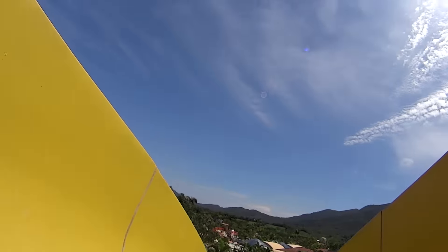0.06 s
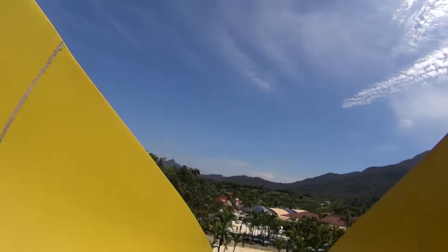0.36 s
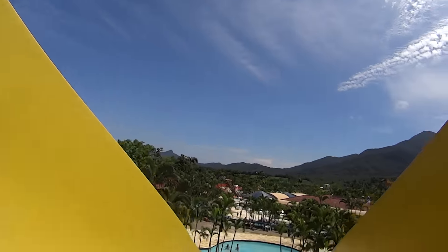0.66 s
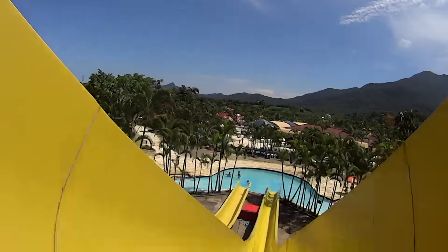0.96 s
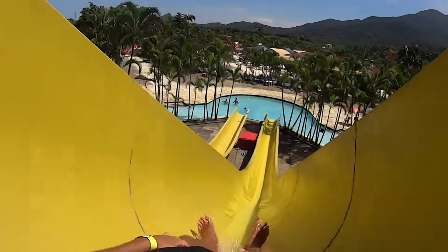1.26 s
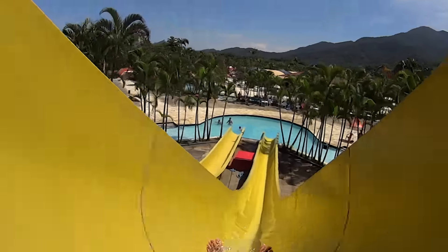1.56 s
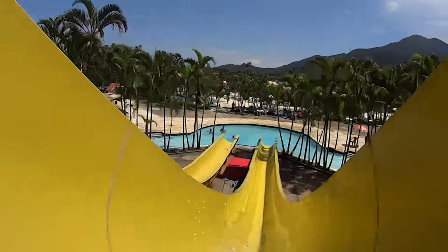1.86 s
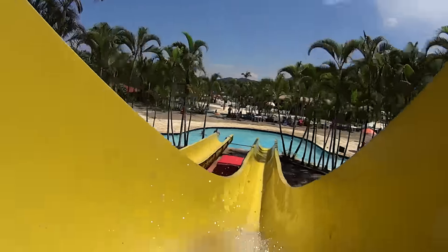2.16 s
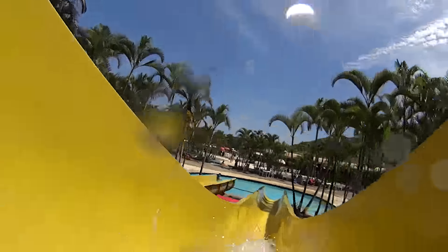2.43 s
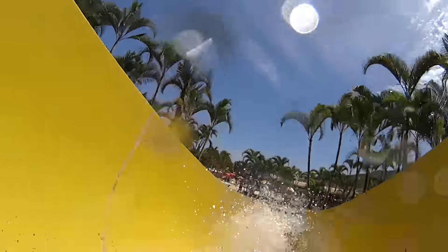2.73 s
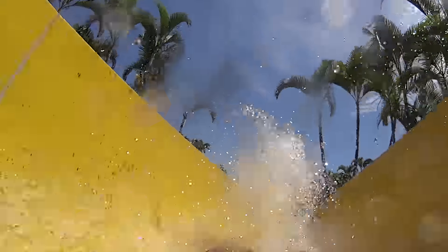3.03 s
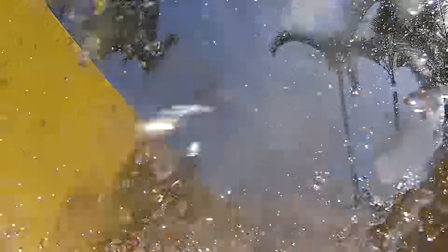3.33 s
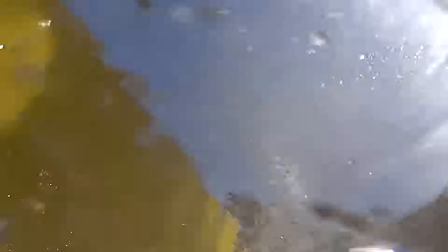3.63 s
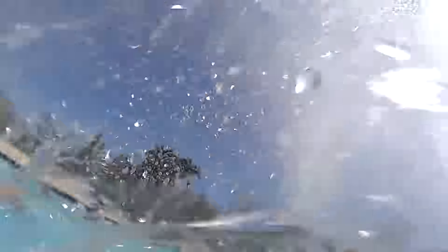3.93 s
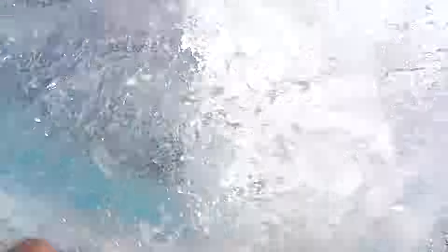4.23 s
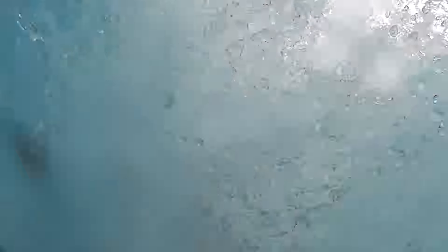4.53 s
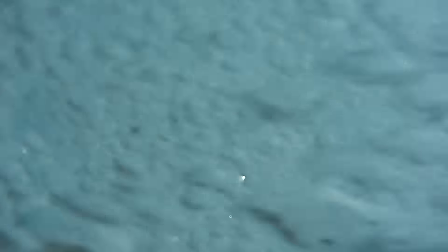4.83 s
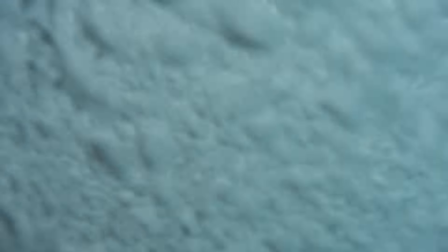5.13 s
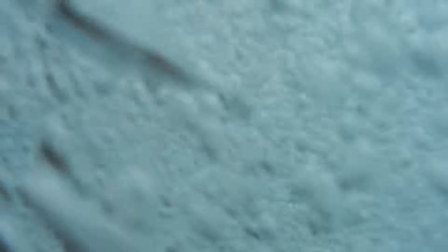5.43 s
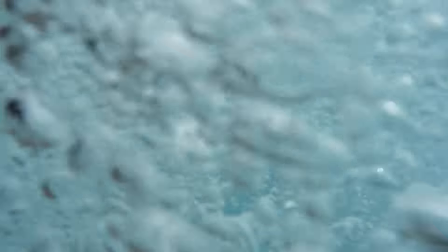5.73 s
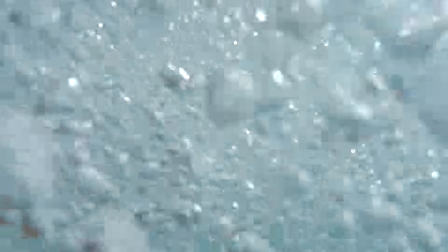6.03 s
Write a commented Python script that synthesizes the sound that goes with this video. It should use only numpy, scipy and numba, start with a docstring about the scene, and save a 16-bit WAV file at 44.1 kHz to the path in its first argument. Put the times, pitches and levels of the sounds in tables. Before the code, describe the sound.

Close, from a camera riding down an outdoor water slide: a soft watery rush with a few knocks and squirts grows louder, joined by low gusts of wind. Loud slaps and sharp drops pelt the microphone through the flat end of the slide. A foamy splash into the pool follows, then the water closes overhead, leaving a deep, muffled bubbling that fades into scattered pops and gurgles.

```python
"""On a steep open water slide, a rider with a waterproof camera shoots down and plunges into the pool.
The thin film of water hisses, then tears into spray. Wind buffets the camera's ports (its microphone
openings), and water slaps its case, most of all in the run-out, the flat end of the slide.
The splash roars and closes overhead: big bubbles rumble, small ones plink.
A fast limiter turns the sound down for a moment at each hard hit."""
import sys
import numpy as np
from scipy import signal
from scipy.fft import rfft, irfft, next_fast_len
from scipy.io import wavfile
from scipy.ndimage import uniform_filter1d, minimum_filter1d, map_coordinates
from numba import njit

SR = 44100
rng = np.random.default_rng(int(sys.argv[2]) if len(sys.argv) > 2 else 0)


def master(y):
    """Save y as 16-bit WAV."""
    cut = np.clip(np.atleast_2d(y).T, -1, 1)
    pcm = np.round(cut * 32767)  # scale
    wavfile.write(sys.argv[1], SR, pcm.astype(np.int16))


N = 277124
T = np.arange(N) / SR


# Sounds are built as (mid, side) pairs: mid is what both ports share, side is how they differ.
# A ring time, or t60, is the seconds a sound takes to fade by 60 dB.
def undb(db):
    """Turn decibels into a gain to multiply by."""
    return 10 ** (np.asarray(db) / 20)


def unit(x):
    """Scale a (mid, side) pair so that the mid has an average strength (rms) of 1."""
    return x / np.sqrt(np.mean(x[0] ** 2))


def toward(pan):
    """Mid and side weights of a sound placed from -1 (left) to 1 (right)."""
    return np.array([np.ones_like(pan), -np.clip(pan, -1, 1)])


def swell(table, fade_in_s, fade_out_s):
    """Gain that follows (time [s], level [dB]) rows and dies away outside them."""
    s, db = np.transpose(table)
    times = [s[0] - fade_in_s, *s, s[-1] + fade_out_s]
    return undb(np.interp(T, times, [db[0] - 60, *db, db[-1] - 60]))


def envelope(full_s, db, attack_s, hold_s, fall_db_per_s):
    """Gain that rises to db by the time full_s, holds, then dies away."""
    rise = np.clip(1 + (T - full_s) / attack_s, 0, 1)
    return rise * undb(db - fall_db_per_s * np.maximum(T - full_s - hold_s, 0))


def wobble(per_s):
    """A smooth random curve, about 1 in size, that changes about per_s times a second."""
    curve = map_coordinates(rng.standard_normal(8192), [T * per_s], order=2, mode="wrap")
    return curve / curve.std()


def shape(x, points):
    """Turn lows and highs up or down along (frequency [Hz], gain [dB]) points."""
    size = next_fast_len(N + 8192, True)
    hz, db = np.transpose(points)
    freqs = np.maximum(np.arange(size // 2 + 1) * SR / size, 1)
    gain = undb(np.interp(np.log(freqs), np.log(hz), db))
    # folding the cepstrum keeps the filter from ringing before a sound starts
    cepstrum = irfft(np.log(gain), size)
    cepstrum[1:size // 2] *= 2
    cepstrum[size // 2 + 1:] = 0
    return irfft(rfft(x, size) * np.exp(rfft(cepstrum)), size)[..., :N]


def colour(x, tone, stereo_width):
    """Give a (mid, side) pair its tone and its stereo width, at strength 1."""
    mid, side = shape(x, tone)
    return unit(np.array([mid, shape(side, stereo_width)]))


def resonate(x, hz, band_hz):
    """Keep only a band around one pitch, as a hollow space does."""
    return signal.lfilter(*signal.iirpeak(hz, hz / band_hz, fs=SR), x)


def hiss():
    """Separate white noise for mid and side."""
    return rng.standard_normal((2, N))


@njit
def ring(start, hz, t60, glide, rise, weights):
    """Fading tones that build up over `rise` cycles and bend in pitch by the fraction `glide`."""
    out = np.zeros((2, N))
    for k in range(len(start)):
        first, length = int(start[k] * SR), int(t60[k] * SR) + 2
        turn = 2j * np.pi * hz[k] / SR
        pole = np.exp(turn - 6.9 / length)  # 6.9 makes a fade of 60 dB
        bend = np.exp(turn * glide / length)
        step = min(hz[k] / SR / (rise + 1e-9), 1.)
        tone, onset = 1 + 0j, 0.
        for i in range(max(first, 0), min(first + length, N)):
            onset += (1 - onset) * step
            out[0, i] += weights[k, 0] * onset * tone.imag
            out[1, i] += weights[k, 1] * onset * tone.imag
            tone *= pole
            pole *= bend
    return out


def grains(per_s, low_hz, high_hz, cycles, spread_db, glide=0, rise=0):
    """A cloud of ringing drops or bubbles, each with its own moment, pitch, size and direction."""
    when, pitch, chance, angle, sign = rng.random((int(per_s * N / SR), 5)).T
    hz = low_hz * (high_hz / low_hz) ** pitch
    size_db = -spread_db * np.log(np.maximum(chance, .02))
    mid = hz * np.sign(sign - .5) * undb(size_db)  # stronger high rings keep the cloud's tone even
    side = mid * np.sqrt(2) * np.cos(2 * np.pi * angle)
    weights = np.transpose([mid, side])
    return unit(ring(when * N / SR, hz, cycles / hz, float(glide), float(rise), weights))


def strike(s, db, hz, t60, glide, width, rise=0):
    """Single fading rings, each from its own direction, more often from the right."""
    side = width * rng.uniform(-1.8, 1.2, len(s))
    weights = np.transpose([undb(db), undb(db) * side])
    return ring(s, hz, np.full(len(s), t60), float(glide), float(rise), weights)


def bursts(s, db, hz, t60, breadth, width):
    """Short splashes of fading noise around hz; a small breadth whistles, a large one hisses."""
    out = np.zeros((2, N + SR))
    age = np.arange(SR // 6) / SR
    for start, level_db, centre_hz, ring_s in np.broadcast(s, db, hz, t60):
        white = rng.standard_normal((2, len(age)))
        noise = unit(resonate(white, centre_hz, centre_hz * breadth))
        first = int(start * SR)
        out[:, first:first + len(age)] += noise * undb(level_db - 60 * age / ring_s)
    return out[:, :N] * [[1], [width]]


# water under the rider, loud at the push-off and again at full speed: (time [s], level [dB])
RUSH_LEVELS = [(0, -22), (.3, -30), (.7, -33.5), (1.2, -34.5), (1.88, -32), (2.08, -27.5), (2.38, -24.5),
               (2.52, -23), (3.02, -22), (3.28, -23.5), (3.37, -29), (3.41, -28), (3.54, -35.5)]
# tone of the smooth film of water: (frequency [Hz], gain [dB])
FILM_TONE = [(100, -9.5), (320, -13.5), (660, -8), (820, -11), (980, -7), (1200, -2.5), (1400, -11),
             (1620, -2.5), (1830, -17), (2050, -11), (2400, -5), (2820, -2), (3300, -2), (4200, -9.5),
             (5200, -6.5), (8000, -15.5), (11000, -47.5)]
# tone of the brighter spray: (frequency [Hz], gain [dB])
SPRAY_TONE = [(150, -7.5), (600, -33), (1300, -8), (2050, 3), (2700, 10.5), (3700, 6), (5300, 10.5),
              (6500, 6), (8300, 5), (9800, -2), (11200, -7)]
# stereo width of film and spray: (frequency [Hz], side gain [dB])
RUSH_WIDTH = [(60, -14.5), (130, -15), (290, -12.5), (600, -6.5), (1400, -7.5), (1900, -10), (2650, -3),
              (3600, -10), (5300, -9.5), (10000, -7)]
# the slide's hollow rings: (pitch [Hz], bandwidth [Hz], level against film [dB], pan [-1 left, 1 right])
SLIDE_RINGS = [(1257, 61, -10.5, 0.33), (2790, 260, -7.5, -0.5)]
# squirts at the joints of the slide: (time [s], level [dB])
JOINT_SQUIRTS = [(.21, -27.5), (.565, -35.5), (1.088, -27.5)]


def water_rush():
    """The film fizzes, rings the slide and squirts at joints; with speed it tears into spray."""
    fizz = grains(per_s=3000, low_hz=518, high_hz=10240, cycles=17, spread_db=1, glide=.34)
    film = colour(hiss() + undb(-1.5) * fizz, FILM_TONE, RUSH_WIDTH)
    for hz, band_hz, db, pan in SLIDE_RINGS:
        hollow = unit(resonate(hiss(), hz, band_hz))[0]
        film += undb(db) * np.outer(toward(pan), hollow)
    film *= undb(-.67 + .93 * wobble(45.2))
    spray = colour(hiss(), SPRAY_TONE, RUSH_WIDTH) * undb(4.5 + wobble(60))
    spray_share = np.interp(T, [.79, 2.93], [.047, .83])  # from the top of the slope to its foot
    water = np.sqrt(1 - spray_share) * film + np.sqrt(spray_share) * spray
    squirts = sum(envelope(s, db, attack_s=.033, hold_s=.0042, fall_db_per_s=330)
                  for s, db in JOINT_SQUIRTS)
    return water * np.hypot(swell(RUSH_LEVELS, .1, .53), squirts)


# steady flow of air, and later water, past the ports: (time [s], level [dB])
FLOW_LEVELS = [(0, -48), (.8, -38.5), (1.2, -34.5), (1.5, -32.5), (2.0, -25.5), (2.25, -29.5),
               (2.95, -29.5), (3.5, -38), (4.15, -43.5), (4.35, -32), (4.8, -27.5), (5.4, -45), (6.28, -53)]
# single gusts on the ports: (time [s], level [dB])
GUST_HITS = [(.51, -35.5), (.83, -33.5), (1.14, -30.5), (1.36, -36), (1.52, -27.5), (1.78, -24.5),
             (2.09, -24), (2.36, -21), (2.5, -48), (2.63, -26), (2.85, -27), (3.17, -30), (3.72, -32),
             (4.06, -24.5), (4.26, -31), (4.37, -28), (5.4, -34), (5.74, -32), (6.02, -46)]
# tone of the wind's rumble: (frequency [Hz], gain [dB])
WIND_TONE = [(15, -4.5), (28, -3.5), (45, 0.5), (70, -6), (130, -13), (220, -18.5), (400, -27), (900, -35),
             (8000, -101)]
# stereo width of the wind: (frequency [Hz], side gain [dB])
WIND_WIDTH = [(50, -14.5), (90, -7), (140, -5), (290, 10), (600, 8.5)]


def wind():
    """Swirls thump on the ports; a weak flow has only the big, slow ones."""
    gusts = sum(envelope(s, db, attack_s=.077, hold_s=.005, fall_db_per_s=149) for s, db in GUST_HITS)
    flow = np.hypot(swell(FLOW_LEVELS, .1, .1), gusts)
    swirls = colour(hiss(), WIND_TONE, WIND_WIDTH) * undb(2 * wobble(45) + 3 * wobble(10.99))
    slow = shape(swirls, [(45, -1), (110, -13.5), (300, -6.5)])
    strength = np.minimum(flow / undb(-25), 1)
    return (slow + strength * (swirls - slow)) * flow * undb(-.5)


# the rider's knocks and heavy slaps of water: (time [s], level [dB], pitch [Hz], base ring time [s])
SLAP_HITS = [(0.377, -18, 650, 0.053), (.519, -15.5, 1100, 0.028), (1.142, -25, 1100, 0.13),
             (1.78, -20.5, 195, 0.036), (2.036, -4.5, 760, 0.01), (2.34, -19, 298, 0.027),
             (2.367, 0, 410, 0.014), (2.406, 0.5, 656, 0.019), (2.626, -5, 134, 0.019),
             (2.665, -3.5, 670, 0.032), (2.696, -13, 270, 0.017), (2.909, 4.5, 634, 0.027),
             (3.105, 4.5, 1190, 0.03), (3.162, -1.5, 605, 0.042), (3.351, -8, 1090, 0.033),
             (3.468, -9, 970, 0.046), (3.503, -16, 1100, 0.021), (3.554, 6, 780, 0.013),
             (3.626, -2.5, 600, 0.026), (4, 4.5, 1164, 0.04), (4.037, -6.5, 710, 0.03),
             (4.049, -4.5, 550, 0.026), (4.096, -10.5, 683, 0.03), (4.367, -9, 135, 0.021)]


def slaps():
    """Each blow cracks, rings briefly, throws a short slosh and thuds low in the case."""
    s, db, hz, base_t60 = np.transpose(SLAP_HITS)
    body = strike(s, db - 3, hz, base_t60 * .35, glide=-.1, width=.4)
    crack = strike(s, db - 6.5, hz * 2, t60=.0076, glide=-.15, width=.36)
    slosh = bursts(s, db - 7.5, hz, base_t60 * 1.53, breadth=.35, width=.85)
    thud = bursts(s, db - 34, hz / 3, base_t60 * 3.7, breadth=.94, width=.88)
    splash = shape(slosh + thud, [(50, 14), (150, 8), (1800, -3.5), (5000, 6), (10000, -12)])
    return body + crack + splash


# squirts that whistle: (time [s], level [dB], pitch [Hz])
WHISTLING_SQUIRTS = [(.568, -28.5, 2750), (1.1, -39, 2810)]


def squeaks():
    """Water squeezed out from under the rider whistles briefly."""
    s, db, hz = np.transpose(WHISTLING_SQUIRTS)
    return bursts(s, db, hz, t60=.3, breadth=.025, width=.38)


# water spitting from a joint: (time [s], level [dB])
JOINT_SPITS = [(1.084, -20), (1.0922, -15), (1.111, -22)]


def spits():
    """Water caught at a joint spits against the case in crisp bursts."""
    s, db = np.transpose(JOINT_SPITS)
    crisp = bursts(s, db, hz=3050, t60=.026, breadth=.92, width=.34)
    return shape(crisp, [(6000, -2), (10000, -17)])


# water thrown against the case, most of it in the run-out: (time [s], level [dB])
SPATTER_LEVELS = [(1.9, -38.5), (2.1, -29.5), (3.25, -26.5), (3.42, -22.5), (3.8, -20.5), (4.08, -24),
                  (4.18, -27)]
# tone of the spatter: (frequency [Hz], gain [dB])
SPATTER_TONE = [(60, -19), (120, -5), (400, -7), (800, -5), (1200, -2), (1600, 0), (2050, -11.5),
                (2500, -2), (2850, -12), (3250, -5), (3800, -10), (4600, -7), (5400, -14.5), (6500, -16.5),
                (8300, -28), (11000, -25)]
# stereo width of the spatter, and later of the plunge: (frequency [Hz], side gain [dB])
SPLASH_WIDTH = [(60, -22), (150, -17.5), (330, -0.5), (800, -2.5), (1400, -8), (1900, -1.5), (2400, -5.5),
                (3800, -2), (6200, 2), (9000, -8)]
# sheets of water thrown over the case: (start [s], level [dB], hold [s])
WATER_SHEETS = [(3.352, -24, .03), (3.424, -18, 0.019), (3.47, -13, 0.013), (3.5, -17, 0.017),
                (3.558, -10, 0.022), (3.628, -16.5, 0.014), (3.665, -16, 0.021), (3.689, -16, 0.027),
                (3.773, -19, 0.029), (3.833, -26.5, 0.03), (3.901, -23.5, 0.016), (3.936, -21.5, 0.035),
                (4.005, -10, 0.0061), (4.104, -32, .012)]


def spatter():
    """Drops drum on the case in gushes and surge with each sheet of water; fat ones knock longer."""
    fine = grains(per_s=2400, low_hz=220, high_hz=11000, cycles=5, spread_db=3.5)
    fat = grains(per_s=260, low_hz=750, high_hz=2000, cycles=10, spread_db=2.5, rise=.4)
    mist = undb(-7) * hiss()
    patter = colour((fine + mist) * undb(.3 * wobble(210)), SPATTER_TONE, SPLASH_WIDTH)
    knocks = fat * [[1], [.5]] * undb(-6.5)  # half the side: nearer the centre
    attack_s = .0017
    sheets = sum(envelope(s + attack_s, db, attack_s, hold_s, fall_db_per_s=900)
                 for s, db, hold_s in WATER_SHEETS)
    gushes = undb(2.8 * wobble(70)) * swell(SPATTER_LEVELS, 4.2, .062)
    return (patter + knocks) * np.hypot(gushes, sheets)


# fat drops landing on the case: (time [s], level [dB])
SPLAT_HITS = [(2.089, -8.5), (2.111, -11), (2.132, -10), (2.1914, -8.5), (2.243, -10), (2.2548, -2),
              (2.2791, 2.5), (2.376, 2), (2.4646, -10), (2.59, -8.5), (2.6917, -8), (2.925, -9),
              (3.0315, -8), (3.252, -1), (3.3535, -15), (3.363, -14), (3.4096, 5.5), (3.4195, 0),
              (3.432, -7.5), (3.445, -5), (3.476, -15), (3.519, -14), (3.555, -2), (3.572, -10),
              (3.617, -12), (3.654, -7), (3.667, 3.5), (3.787, -1), (3.831, -9), (3.845, -8), (3.864, -10),
              (3.88, -23), (3.964, -15), (4.011, 3), (4.106, -17), (4.152, -17), (4.157, -17)]


def splats():
    """Fat drops burst on the case with a short, hollow smack and a wet scatter."""
    s, db = np.transpose(SPLAT_HITS)
    hz = 1630 * np.exp(.12 * rng.standard_normal(len(s)))
    smacks = strike(s, db - 1, hz, t60=.00455, glide=0, width=.5)
    scatter = bursts(s, db - 3.5, hz, t60=.0091, breadth=.99, width=.8)
    return shape(smacks + scatter, [(400, -4.5), (1100, 0), (2600, 1), (3500, -16.5), (10000, -17)])


# drops that land right on a port: (time [s], level [dB], pan [-1 left, 1 right])
PORT_HITS = [(2.269, 0, .2), (2.382, -0.5, .5), (2.753, 7.5, -0.78), (2.7675, 7, -0.42), (3.114, 4, -.4),
             (3.207, 3, 0.24), (3.291, 2.5, -.2), (3.334, 2, -.3), (3.393, 3.5, 0), (3.3982, -1, .4),
             (3.42, 3, .2), (3.451, -1.5, .1), (3.465, -7, .3), (3.5664, 8, -.5), (3.588, 1, 0),
             (3.656, 0, 0.094), (3.707, -5, .3), (3.756, 0, 0), (3.972, 0.5, 0.049), (4.019, 0.5, 0),
             (4.0822, -1, .4)]
# rings of the air inside a port: (pitch [Hz], level [dB], ring time [s])
PORT_RINGS = [(2550, -4.5, 0.0052), (5370, -2, 0.0018)]


def port_drops():
    """A direct hit rings the air in a port: a very short crack, far louder than the rush."""
    s, db, pan = np.transpose(PORT_HITS)
    cracks = np.zeros((2, N))
    for hz, ring_db, t60 in PORT_RINGS:
        weights = (toward(pan) * undb(db + ring_db)).T
        cracks += ring(s, np.full(len(s), hz), np.full(len(s), t60), glide=0., rise=0., weights=weights)
    return cracks


def stray_drops():
    """Small, hard drops tick on the ports one by one all through the run-out."""
    ticks = grains(per_s=80, low_hz=2000, high_hz=8000, cycles=5, spread_db=2.2)
    run_out = envelope(full_s=3.25, db=-31, attack_s=.02, hold_s=.65, fall_db_per_s=89)
    return ticks * [[1], [.5]] * run_out


# foam from hitting the pool, then from air welling up: (time [s], level [dB], hold [s], fade [s])
FOAM_SURGES = [(4.211, -18, 0.64, 0.55), (4.643, -30.5, 0.16, 0.4), (5.078, -17.5, 0.031, 0.13),
               (5.17, -32.5, 0.029, 0.11)]
# tone of the foam: (frequency [Hz], gain [dB])
FOAM_TONE = [(100, -10.5), (180, -11), (400, -9.5), (800, -6), (1220, -0.5), (1650, -4), (2050, -11.5),
             (2560, -2.5), (2850, -10.5), (3500, -10), (5000, -10.5), (6500, -17), (8400, -34.5),
             (10700, -26.5)]


def plunge():
    """The rider ploughs the pool into a dense roar of foam."""
    foam = grains(per_s=4000, low_hz=119.2, high_hz=10800, cycles=32, spread_db=0, glide=.049)
    churn = undb(.4 * wobble(70))
    roar = colour((foam + undb(1.5) * hiss()) * churn, FOAM_TONE, SPLASH_WIDTH)
    surges = sum(envelope(s, db, attack_s=.037, hold_s=hold_s, fall_db_per_s=60 / fade_s)
                 for s, db, hold_s, fade_s in FOAM_SURGES)
    return roar * surges


# the pocket of air collapsing behind the rider: (time [s], level [dB])
POCKET_LEVELS = [(4.24, -28.5), (4.38, -36), (4.62, -30.5), (4.72, -16), (5.4, -22.5), (5.6, -38)]
# tone of that pocket: (frequency [Hz], gain [dB])
POCKET_TONE = [(30, -17), (75, -13), (130, -4), (190, -7.5), (300, -6), (700, -33.5), (6000, -100)]
# stereo width of the pocket, and later of the bubble cloud: (frequency [Hz], side gain [dB])
UNDERWATER_WIDTH = [(60, -26.5), (250, -3), (480, -7), (780, 4.5), (1100, 3), (1600, -3.5), (2600, -6),
                    (5500, -0.5), (9000, -12)]


def air_pocket():
    """The pocket of air pulled down by the rider throbs as it breaks up."""
    throbs = grains(per_s=330, low_hz=56, high_hz=303, cycles=13.6, spread_db=4, glide=.1, rise=.077)
    return colour(throbs, POCKET_TONE, UNDERWATER_WIDTH) * swell(POCKET_LEVELS, .11, .4)


SUBMERGED_S = 4.655  # the water closes overhead
# tone of the big bubbles: (frequency [Hz], gain [dB])
BOOM_TONE = [(30, -40), (70, -11), (160, -0.5), (260, -1.5), (420, 1), (540, 0), (680, -13), (1000, -20.5),
             (1800, -36), (9000, -92)]


def bubble_boom():
    """The dragged-down air breaks into a cloud of big, booming bubbles that grow duller."""
    big = grains(per_s=800, low_hz=88, high_hz=1000, cycles=25, spread_db=.8, glide=.22, rise=.15)
    boom = colour(big, BOOM_TONE, UNDERWATER_WIDTH) * undb(wobble(12))
    dull = shape(boom, [(130, -4.5), (400, 3), (620, -3)])
    dull_share = np.clip((T - SUBMERGED_S) / 1.2, 0, 1)
    level = envelope(SUBMERGED_S + .073, db=-11, attack_s=.073, hold_s=.4, fall_db_per_s=10.5)
    return (boom + dull_share * (dull - boom)) * level


# tone of the small bubbles: (frequency [Hz], gain [dB])
FIZZ_TONE = [(400, 12), (1100, 2.5), (1600, 0), (2400, -8), (3500, -14.5), (5200, -13), (7000, -25),
             (8500, -44), (11000, -15.5)]


def bubble_fizz():
    """Small bubbles ping and die away; the finest go first, which leaves the water muffled."""
    small = grains(per_s=1000, low_hz=600, high_hz=3000, cycles=20, spread_db=2.8, glide=.04, rise=1.4)
    tiny = grains(per_s=2400, low_hz=2200, high_hz=7600, cycles=22, spread_db=3.5, glide=.03, rise=2.5)
    clusters = tiny * undb(1 + 3 * wobble(40) + 3 * wobble(260))
    foam = undb(-11) * hiss()
    fine_fade = undb(-7 * np.maximum(T - SUBMERGED_S - .5, 0))  # holds 0.5 s, then falls 7 dB a second
    fizz = colour(small + fine_fade * (clusters + foam), FIZZ_TONE, UNDERWATER_WIDTH)
    return fizz * envelope(SUBMERGED_S + .14, db=-18, attack_s=.14, hold_s=0, fall_db_per_s=17)


# pockets of air bursting against the case: (time [s], level [dB], pitch [Hz])
AIR_POPS = [(4.8835, -6, 2500), (4.951, -9, 4900), (5.0193, -12, 2600), (5.032, -10, 3045),
            (5.0457, -21, 2500), (5.066, -12.5, 3300), (5.085, -5, 2830), (5.097, -7, 3200),
            (5.143, -19, 2540), (5.172, -8.5, 3000), (5.205, -24, 1300), (5.2176, -15.5, 3000),
            (5.242, -10.5, 2600), (5.421, -18.5, 2320), (5.681, -31, 3600), (5.7, -18.5, 1585),
            (5.744, -23, 2310), (5.773, -19.5, 2400), (5.864, -21.5, 1400), (5.897, -21, 3300),
            (6.176, -18.5, 2960), (6.201, -22, 1300), (6.255, -11.5, 3650), (6.27, -15, 4800)]


def pops():
    """Bursting air crackles for an instant; the flooded ports muffle its highs."""
    s, db, hz = np.transpose(AIR_POPS)
    crackle = bursts(s, db - 4.5, hz, t60=.028, breadth=.88, width=.62)
    flooded_tone = [(300, -7), (1000, 13), (5200, -8.5), (7200, -15.5), (8600, -24), (11000, -16.5)]
    return shape(crackle, flooded_tone)


# single bubbles close to the case: (time [s], level [dB], pitch [Hz])
NEAR_BUBBLES = [(4.884, -4, 3560), (4.89, -5, 525), (4.951, -21, 5270), (4.961, -9, 4930),
                (4.967, 2.5, 428), (5.085, -3, 3100), (5.172, -11, 3930), (5.18, -14, 5500),
                (5.254, -0.5, 440), (5.282, -23, 4000), (5.304, -35, 4270), (5.34, -1, 338),
                (5.372, -24, 4300), (5.393, -24, 4020), (5.422, -20, 1590), (5.454, -16.5, 985),
                (5.46, -7, 395), (5.469, -18, 4120), (5.522, -24, 6500), (5.543, -21.5, 3580),
                (5.547, -13, 410), (5.584, -11, 1060), (5.592, -7, 373), (5.627, -24, 5300),
                (5.658, -6.5, 365), (5.683, -19, 4900), (5.741, -9.5, 474), (5.742, -26, 4030),
                (5.749, -16.5, 1096), (5.773, -18.5, 4220), (5.776, -17, 1005), (5.811, -9, 365),
                (5.825, -22, 574), (5.857, -7.5, 280), (5.884, -14, 1600), (5.886, -16.5, 2090),
                (5.9, -19.5, 3350), (5.902, -21.5, 6900), (5.917, -3.5, 250), (5.946, -19.5, 1245),
                (6.055, -6.5, 290), (6.058, -23.5, 1600), (6.092, -35, 4200), (6.104, -8, 455),
                (6.112, -28, 3420), (6.124, -10.5, 197), (6.161, -28.5, 4940), (6.177, -18, 3200),
                (6.184, -9.5, 440), (6.201, -9, 425), (6.228, -21, 4800), (6.244, -17, 4260),
                (6.255, -8.5, 4300)]


def near_bubbles():
    """Bubbles glug or plink, rising a little in pitch; small ones pinch off with a soft crackle."""
    s, db, hz = np.transpose(NEAR_BUBBLES)
    t60 = .15 / (1 + hz / 480)  # big, low bubbles ring longest
    rings = strike(s, db, hz, t60, glide=.11, width=.77, rise=.5)
    rings = shape(rings, [(1800, 0), (3500, -3.5), (7300, -6), (8800, -20)])
    small = hz > 2800
    crackle = bursts(s[small], db[small] - 12, hz[small], t60=.018, breadth=.55, width=.6)
    return rings + shape(crackle, [(6500, -5), (8800, -13)])


# rings of the last big gulp: (pitch [Hz], level [dB], ring time [s])
GULP_RINGS = [(149, -1.5, 0.031), (374, -0.5, 0.1), (581, -7.5, 0.12), (726, -13.5, 0.12)]


def gulp():
    """A big pocket of air lets go with a thump and a hollow ring that bends upwards."""
    hz, db, t60 = np.transpose(GULP_RINGS)
    start_s = np.full(len(hz), 6.019)
    return strike(start_s, db, hz, t60, glide=.066, width=1, rise=.59)


# the right port hears more of the middle range: (frequency [Hz], right minus left [dB])
PORT_BALANCE = [(60, 1), (140, -2), (280, 0), (480, 2), (1130, 3), (2000, 2), (3600, 0.5), (11000, 0.6)]


def scene():
    """All the water and air as the left and right ports hear it."""
    slide = water_rush() + wind() + slaps() + squeaks() + spits()
    thrown_water = spatter() + splats() + port_drops() + stray_drops()
    pool = plunge() + air_pocket() + bubble_boom() + bubble_fizz() + pops() + near_bubbles() + gulp()
    mid, side = slide + thrown_water + pool
    left = shape(mid + side, [(hz, -db / 2) for hz, db in PORT_BALANCE])
    right = shape(mid - side, [(hz, db / 2) for hz, db in PORT_BALANCE])
    return np.array([left, right])


def limiter(x, ceiling_db, release_db_per_s):
    """The gain drops just before a mid or side peak passes the ceiling, then climbs steadily back."""
    peak = np.maximum(np.abs(x[0] + x[1]), np.abs(x[0] - x[1])) / 2
    over_db = np.maximum(20 * np.log10(peak + 1e-9) - ceiling_db, 0)
    cut_db = np.maximum.accumulate(over_db + release_db_per_s * T) - release_db_per_s * T
    early_gain_db = minimum_filter1d(-cut_db, size=111)
    return x * undb(uniform_filter1d(early_gain_db, size=55))


# rings of the hollows in the camera case: (pitch [Hz], bandwidth [Hz], boost [dB])
CASE_RINGS = [(1214, 42, 2.5), (4900, 120, 0.5)]


def record(dry):
    """The case rings a little; the camera limits the peaks and cuts the highest treble."""
    case = sum((undb(db) - 1) * resonate(dry, hz, band_hz) for hz, band_hz, db in CASE_RINGS)
    limited = limiter(dry + case, ceiling_db=-6, release_db_per_s=344)
    top_hz = 11050
    return signal.sosfilt(signal.ellip(10, .2, 70, top_hz, fs=SR, output="sos"), limited)


dry = scene()
out = record(dry)
master(out)
```